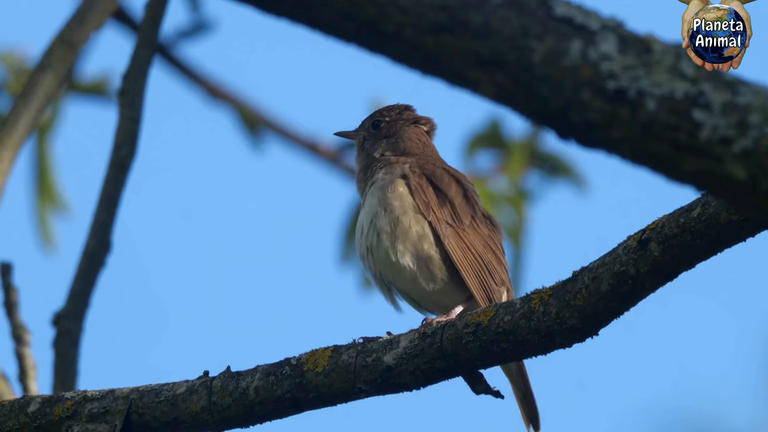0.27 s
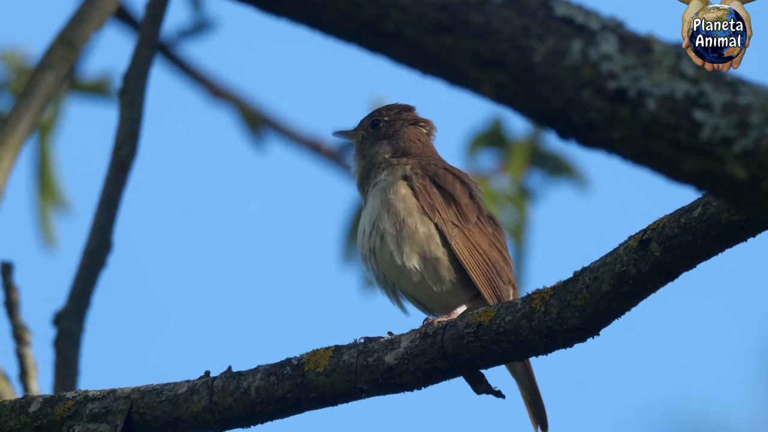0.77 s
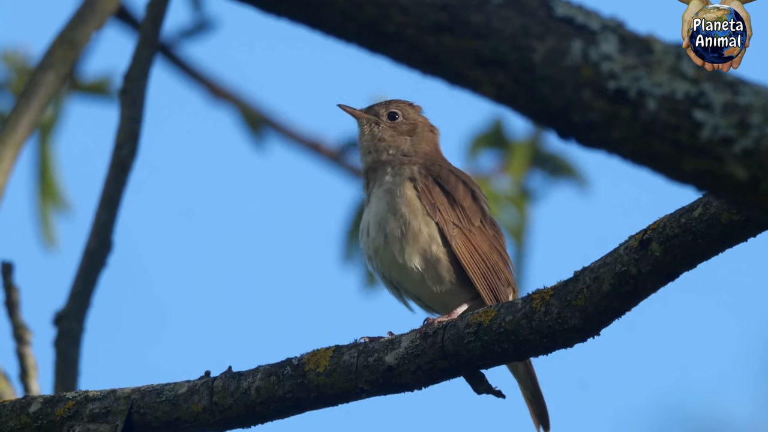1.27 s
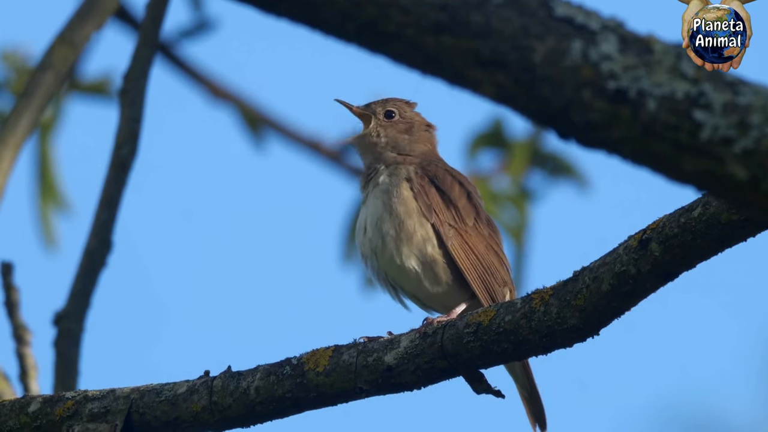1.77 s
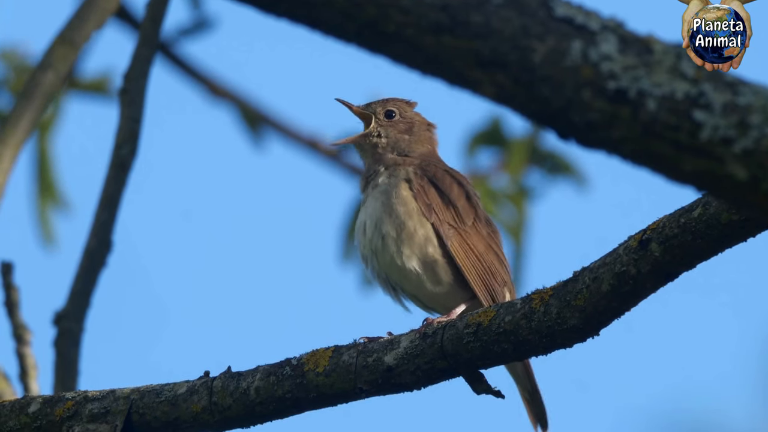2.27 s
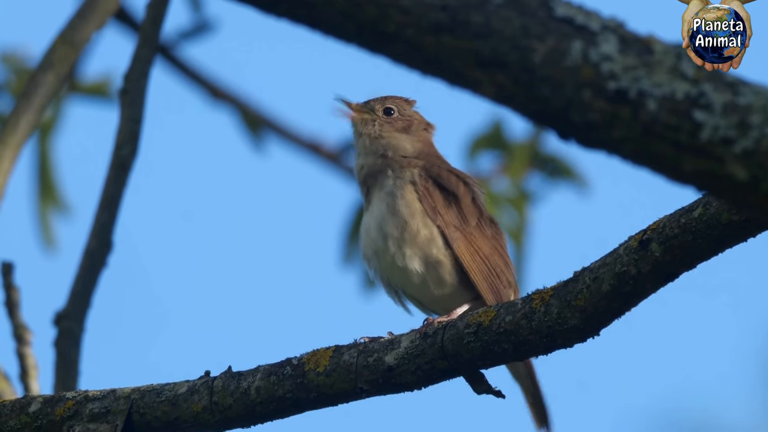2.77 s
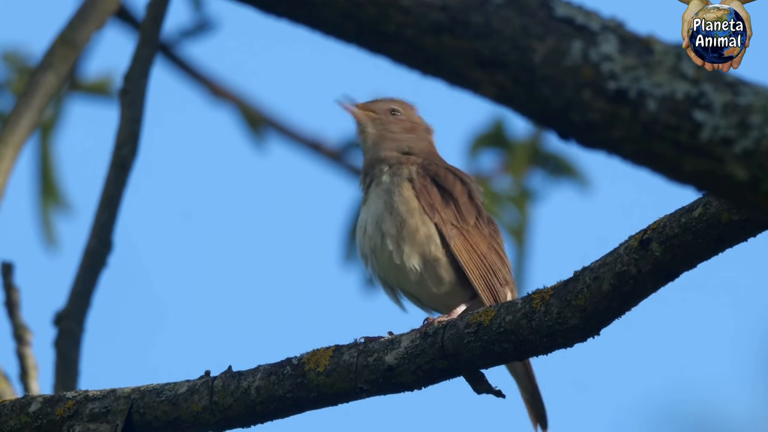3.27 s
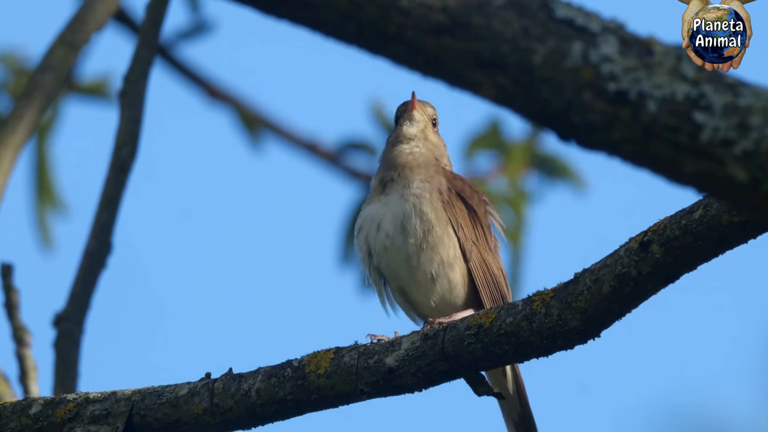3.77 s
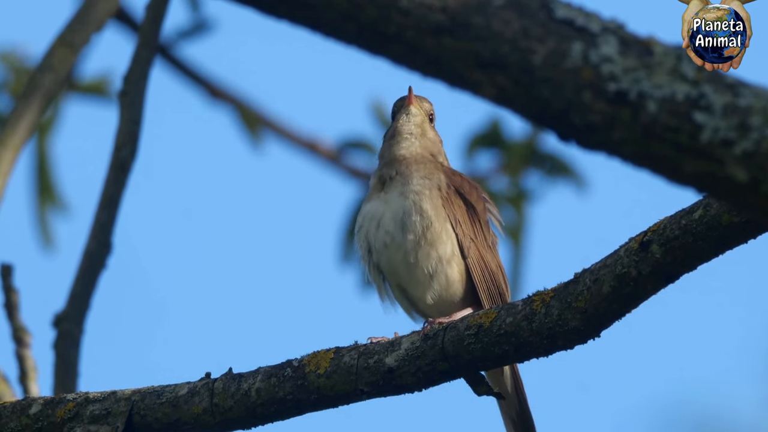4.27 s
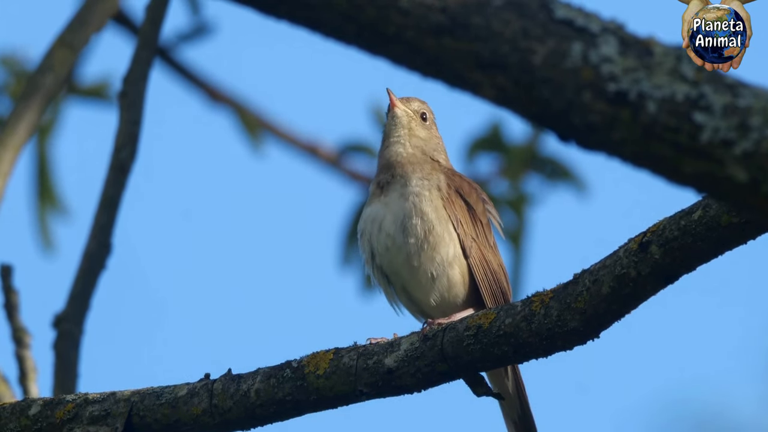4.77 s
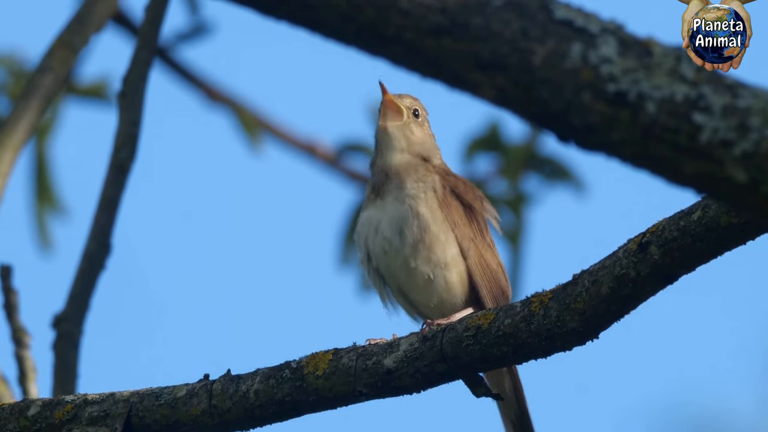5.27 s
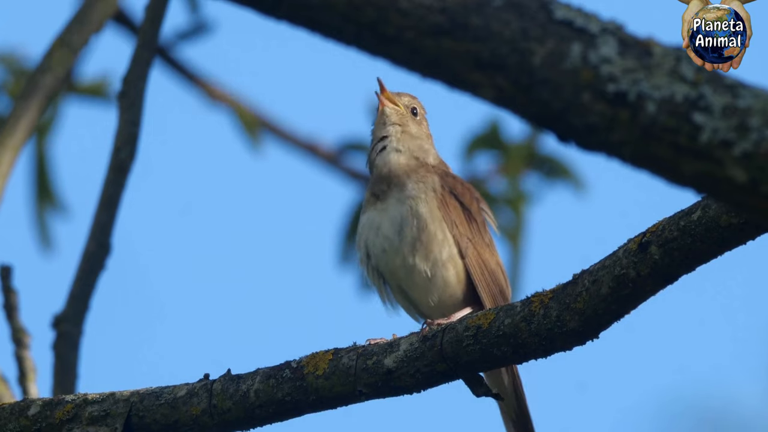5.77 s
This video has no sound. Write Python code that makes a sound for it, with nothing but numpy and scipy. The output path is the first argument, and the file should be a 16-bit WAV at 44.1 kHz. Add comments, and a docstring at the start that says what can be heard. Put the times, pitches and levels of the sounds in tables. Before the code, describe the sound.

After an instant of silence, a close nightingale begins with the end of a faint whistle, a tiny thin seep near 0.3 s and a swelling whistle at 0.5-0.7 that leaps upward. Soft falling flute notes at 0.9 and 1.5 are answered by sharp, warbled high slurs at 1.15 and 1.75, each trailing a fast train of ticks. A swoop at 2.05, another ticking slur at 2.3, then three swoops with downward flicks from 2.55 to 3.25, low murmurs between. A dry, snapping rattle runs 3.35-3.75; its echo cuts off abruptly. A loud whistle swells at 3.9-4.1. Rasps at 4.3 and 4.75 each lead to a chipped, falling drop. From 5.15 to the end, five whip-and-double-note syllables repeat about five per second. Trees return short, bright echoes. Far away, coos sound before 1 s, faint twittering and three hoarse caws around 1.4-2.4, over soft rumble, engine hum and hiss.

```python
"""A nightingale sings close to the microphone: swelling whistles, falling flute notes, sharp slurs with trains of
high ticks, swoops, a rattle, rasps and a closing run of repeated notes. Each note is a gesture of pitch and pressure
driving an oscillating membrane in the syrinx, shaped by the throat. Trees scatter the song as filtered, decaying
noise echoes; a crow (pulses through resonances) and small birds call far off over a faint rumble, hum and hiss."""
import sys
import numpy as np
from scipy import signal
from scipy.fft import rfft, irfft
from scipy.io import wavfile
from scipy.ndimage import uniform_filter1d

SR = 44100
rng = np.random.default_rng(int(sys.argv[2]) if len(sys.argv) > 2 else 0)


def bounce(signal):
    """Save signal as a 16-bit WAV file at the path given by the first command-line argument."""
    frames = np.transpose(np.atleast_2d(signal))
    limited = np.clip(frames, -1, 1)
    pcm = np.round(limited * 32767).astype(np.int16)
    wavfile.write(sys.argv[1], SR, pcm)


N = 265702
TOP_HZ = 15700  # upper limit of the sound
ACCENT_MS = 4.55  # time constant of the push at the start of falls and swoops

# Slurs with their ticks. Each row: start in seconds, pitch factor, gain in dB, ticks' delay in ms,
# tick spacing in ms, tick count, ticks' gain in dB.
SLURS = [(1.1505, 0.95, -2, 39, 11.6, 6, -3.5), (1.746, 1.004, -0.4, 38, 12.1, 7, 0),
         (2.278, 0.99, -0.6, 30, 11.7, 8, -1.5)]
# Loud falling notes. Each row: start in seconds, pitch factor, gain in dB.
DROPS = [(4.5207, 0.96, -1.1), (4.9584, 0.98, 0.11)]
# Overtones passed by the throat. Each row: frequency in Hz, relative level in dB.
THROAT = [(2600, -32), (3600, -32), (4400, -42), (6500, -51.5), (8500, -57.5), (10400, -52), (11900, -52),
          (13500, -61), (15500, -69)]


def undb(db):
    """Decibels to gain."""
    return 10 ** (np.asarray(db) / 20)


def unit(x):
    """Scale to rms 1."""
    return x / np.sqrt(np.mean(x ** 2) + 1e-18)


def wander(size, hz):
    """Smooth random motion of spread about 1, with rates up to about hz."""
    padded = size + SR // 10
    f = np.fft.rfftfreq(padded, 1 / SR)
    spectrum = rfft(rng.standard_normal(padded)) * np.exp(-(f / hz) ** 2)
    return unit(irfft(spectrum))[:size]


def log_curve(f, hz, values):
    """Read a curve over log frequency."""
    return np.interp(np.log(f + 1), np.log(hz), values)


def add(track, s, sound):
    """Mix a sound into the track at time s, trimming what lies outside."""
    i = int(s * SR)
    sound, i = sound[max(-i, 0):], max(i, 0)
    track[i:i + len(sound)] += sound[:max(N - i, 0)]


def syrinx(gesture, pitch, rough, rough_hz, throat, overtone_db, fundamental_db, count=14):
    """One membrane follows a gesture: a tone with overtones, smeared when its vibration turns irregular."""
    ms, hz, db = np.transpose(gesture)
    t_ms = np.arange(int(ms.max() * SR / 1000)) * 1000 / SR
    size = len(t_ms)
    glide = uniform_filter1d(np.interp(t_ms, ms, hz), SR // 600, mode="nearest")
    glide = pitch * glide * (1 + 0.0027 * wander(size, 120))
    phase = 2 * np.pi * np.cumsum(glide) / SR + rough * wander(size, rough_hz)
    valve = np.sin(np.pi / 2 * np.clip(np.minimum(t_ms, t_ms[-1] - t_ms) / .9, 0, 1)) ** 2
    pressure = valve * undb(np.interp(t_ms, ms, db) + .5 * wander(size, 160))
    pressure = pressure * (1 + rough / 2 * wander(size, rough_hz))
    overtones = 0
    for k in range(2, count + 1):
        level = undb(log_curve(k * glide, *np.transpose(throat)))
        overtones = overtones + level * np.sin(k * phase) * (k * glide < TOP_HZ)
    return pressure * (undb(fundamental_db) * np.sin(phase) + undb(overtone_db) * overtones)


def sing(gesture, notes, rough=0., rough_hz=1500., throat=THROAT, overtone_db=0., fundamental_db=0.):
    """Repeat one gesture at the notes' times, pitches and gains."""
    out = np.zeros(N)
    for s, factor, db, *_ in notes:
        note = syrinx(gesture, factor, rough, rough_hz, throat, overtone_db, fundamental_db)
        add(out, s, undb(db) * note)
    return out


def later(notes, delay_ms):
    """The same notes, shifted in time."""
    return [(s + delay_ms / 1000, factor, db) for s, factor, db in notes]


def pulsed(notes, pattern):
    """Break each note into a pattern of pulses."""
    pulses = []
    for ms, ratio, step_db in pattern:
        changed = [(s, factor * ratio, db + step_db) for s, factor, db in notes]
        pulses += later(changed, ms)
    return pulses


def clock(length_ms):
    """Time within a note, in ms."""
    return np.linspace(0, length_ms, 300)


def gesture_of(ms, hz, db, attack_ms, release_ms):
    """Rows of ms, Hz and dB: pressure opens and closes smoothly around the given level."""
    edge = np.clip(np.minimum(ms / attack_ms, (ms[-1] - ms) / release_ms), 0, 1)
    opening_db = 20 * np.log10(np.sin(np.pi / 2 * edge) ** 2 + .01)
    return np.column_stack([ms, hz, db + opening_db])


def resonance(hz, centre_hz, width_hz, boost_db):
    """Swell in dB as the pitch passes the tuning of the throat."""
    return boost_db * np.exp(-((hz - centre_hz) / width_hz) ** 2)


def sweep(length_ms, start_hz, end_hz, db, peak_ms, rise_db, fall_db):
    """An even glide in log pitch, its level in straight dB lines to and from peak_ms."""
    ms = clock(length_ms)
    level = np.interp(ms, [0, min(peak_ms, length_ms), length_ms], [db - rise_db, db, db - fall_db])
    return np.column_stack([ms, start_hz * (end_hz / start_hz) ** (ms / length_ms), level])


def fall(length_ms, start_hz, end_hz, settle_ms, db, accent_db, fade_db, attack_ms, release_ms):
    """The membrane relaxes: pitch settles on a low note while the pressure runs out."""
    ms = clock(length_ms)
    hz = end_hz + (start_hz - end_hz) * np.exp(-ms / settle_ms)
    level = db + accent_db * np.exp(-ms / ACCENT_MS) - fade_db * (ms / length_ms) ** 2
    return gesture_of(ms, hz, level, attack_ms, release_ms)


def hold(length_ms, hz, db, attack_ms, release_ms):
    """A level note on one pitch."""
    ms = clock(length_ms)
    return gesture_of(ms, np.full_like(ms, hz), db, attack_ms, release_ms)


def whistle(length_ms, low_hz, sag_hz, sag_ms, leap_hz, leap_at_ms, leap_ms,
            db, swell_db, attack_ms, release_ms):
    """A long crescendo that sags in pitch, then leaps up near its loudest."""
    ms = clock(length_ms)
    sag = sag_hz * np.maximum(1 - ms / sag_ms, 0) ** 2
    leap = leap_hz * (1 + np.tanh((ms - leap_at_ms) / leap_ms)) / 2
    level = db + swell_db * (ms / length_ms - 1)
    return gesture_of(ms, low_hz + sag + leap, level, attack_ms, release_ms)


def slur(length_ms, start_hz, end_hz, settle_ms, warble_hz, depth_hz, db, attack_ms, release_ms):
    """A steep high fall with a quick warble that grows on the way down."""
    ms = clock(length_ms)
    fallen = 1 - np.exp(-ms / settle_ms)
    warble = depth_hz * np.sqrt(fallen) * np.sin(2 * np.pi * warble_hz * ms / 1000)
    hz = start_hz + (end_hz - start_hz) * fallen + warble
    return gesture_of(ms, hz, db, attack_ms, release_ms)


def swoop(length_ms, low_hz, dip_hz, dip_ms, climb_hz, turn_ms, climb_ms,
          db, accent_db, attack_ms, release_ms):
    """Pitch dips quickly and climbs back through the tuning of the throat."""
    ms = clock(length_ms)
    climb = np.sin(np.pi / 2 * np.clip((ms - turn_ms) / climb_ms, 0, 1)) ** 2
    hz = low_hz + dip_hz * np.exp(-ms / dip_ms) + climb_hz * climb
    level = db + resonance(hz, centre_hz=2004, width_hz=307, boost_db=7)
    level = level + accent_db * np.exp(-ms / ACCENT_MS)
    return gesture_of(ms, hz, level, attack_ms, release_ms)


def whip(length_ms, start_hz, end_hz, bend, db, attack_ms, release_ms):
    """An ever faster fall that cracks as it crosses the tuning of the open throat."""
    ms = clock(length_ms)
    hz = start_hz + (end_hz - start_hz) * (ms / length_ms) ** bend
    level = db + resonance(hz, centre_hz=3300, width_hz=247, boost_db=10.5)
    return gesture_of(ms, hz, level, attack_ms, release_ms)


def whistles():
    """Swelling whistles, a thin rising seep that snaps downwards, and the faint, fading tail of another seep."""
    # Each row: start in seconds, pitch factor, gain in dB.
    long_notes = [(-.127, 0.98, -14.5), (0.479, 1.009, -7), (3.867, 0.9955, -1)]
    seep_notes = [(0.264, 1.002, 0.0047)]
    seep_tail_notes = [(3.7472, 0.96, 0.0072)]
    long = whistle(length_ms=211, low_hz=2190.5, sag_hz=248.3, sag_ms=130, leap_hz=457, leap_at_ms=179,
                   leap_ms=13, db=-8.5, swell_db=17.5, attack_ms=143, release_ms=30.8)
    seep = sweep(length_ms=42, start_hz=7000, end_hz=8040, db=-45, peak_ms=26, rise_db=12.5, fall_db=5.5)
    snap = sweep(length_ms=9, start_hz=6860, end_hz=4350, db=-39.5, peak_ms=8.9, rise_db=5, fall_db=-1)
    seep_tail = sweep(length_ms=65, start_hz=7520, end_hz=7600, db=-50.5, peak_ms=24, rise_db=4.5, fall_db=15)
    thin = sing(seep, seep_notes, rough=.03)
    thin = thin + sing(snap, later(seep_notes, delay_ms=31.0), rough=.03)
    thin = thin + sing(seep_tail, seep_tail_notes, rough=.55, rough_hz=400)
    return sing(long, long_notes, overtone_db=-1.5) + thin


def falling_notes():
    """Soft flute notes, low murmurs between the swoops, and loud drops."""
    # Each row: start in seconds, pitch factor, gain in dB.
    flute_notes = [(.896, 1.005, -0.95), (1.497, .98, 0)]
    murmur_notes = [(2.7217, 1.005, -2), (3.0346, 1.005, -2)]
    flute = fall(length_ms=132.4, start_hz=1573, end_hz=1280, settle_ms=30, db=-19, accent_db=6,
                 fade_db=9.5, attack_ms=10.5, release_ms=5.4)
    murmur = fall(length_ms=70, start_hz=1537, end_hz=970, settle_ms=7, db=-30.5, accent_db=26,
                  fade_db=2.5, attack_ms=3.0, release_ms=4.6)
    drop = fall(length_ms=74, start_hz=1940, end_hz=1246, settle_ms=16, db=-14.5, accent_db=12.5,
                fade_db=18, attack_ms=2.7, release_ms=5.8)
    soft = sing(flute, flute_notes, overtone_db=-5) + sing(murmur, murmur_notes, overtone_db=-1.5)
    return soft + sing(drop, DROPS, rough=.012, overtone_db=-0.5)


def tick_trains():
    """After each slur comes a row of even ticks that arches in pitch, no two quite alike."""
    top_tick, droop = 4.4, .165  # index of the arch's top; share by which the first tick lies lower
    ticks = []
    for s, _, _, delay_ms, spacing_ms, count, db in SLURS:
        variation = rng.uniform(-1, 1, (round(count), 2)) * (.025, 1.5)  # pitch share, dB
        for k, (bend, push_db) in enumerate(variation):
            arch = 1 - droop * (k / top_tick - 1) ** 2
            ticks += later([(s, arch + bend, db + push_db)], delay_ms + k * spacing_ms)
    return ticks


def slurs():
    """Sharp warbled slurs and their high ticks."""
    note = slur(length_ms=36.6, start_hz=5678, end_hz=3420, settle_ms=21, warble_hz=152, depth_hz=390,
                db=-14.0, attack_ms=4.5, release_ms=15.2)
    tick = sweep(length_ms=6.7, start_hz=9500, end_hz=6390, db=-27.0, peak_ms=4.04, rise_db=16.5, fall_db=12)
    notes = sing(note, SLURS, rough=.012, rough_hz=925, overtone_db=21)
    return notes + sing(tick, tick_trains(), rough=.046, overtone_db=21)


def swoops():
    """Each swoop ends in a quick downward flick."""
    # Each row: start in seconds, pitch factor, gain in dB, flick's delay in ms, flick's gain in dB.
    swoop_notes = [(2.055, 0.97, -.4, 53.4, -1), (2.561, 0.99, 0, 56, .5), (2.874, 1.04, 0.4, 56, -0.5),
                   (3.183, 1, -0.5, 58, -0.5)]
    note = swoop(length_ms=56.3, low_hz=1382, dip_hz=739, dip_ms=3.49, climb_hz=1093, turn_ms=10,
                 climb_ms=48, db=-16, accent_db=4.5, attack_ms=3.7, release_ms=10)
    flick = sweep(length_ms=20, start_hz=3110, end_hz=1167, db=-7.5, peak_ms=9.6, rise_db=29, fall_db=20.5)
    flicks = []
    for s, _, _, delay_ms, db in swoop_notes:
        flicks += later([(s, 1, db)], delay_ms)
    notes = sing(note, swoop_notes, rough=0.01, rough_hz=700, overtone_db=-1.5)
    return notes + sing(flick, flicks, rough=0.046, overtone_db=0.5)


def rattle():
    """Each roll is a hoarse chuff and three steep snaps, the first one lower and louder."""
    # Each row: start in seconds, pitch factor, gain in dB.
    rolls = [(3.374, 1.085, -0.055), (3.5085, 1.016, 0.19), (3.648, 0.99, -0.37)]
    # Snaps of a roll. Each row: delay in ms, pitch factor, gain in dB.
    roll_pattern = [(0, 0.9, 2), (36.5, 1.02, -2), (73, 0.99, -3.4)]
    snap = sweep(length_ms=8.6, start_hz=7600, end_hz=3100, db=-18, peak_ms=4.3, rise_db=22, fall_db=20)
    chuff = sweep(length_ms=12, start_hz=3490, end_hz=3660, db=-27, peak_ms=12, rise_db=16.0, fall_db=12.5)
    snaps = sing(snap, pulsed(rolls, roll_pattern), rough=0.22, rough_hz=2060, overtone_db=24)
    chuffs = sing(chuff, later(rolls, delay_ms=-20.5), rough=0.88, rough_hz=1170, overtone_db=14.5)
    return snaps + chuffs


def harsh_notes():
    """Both sides of the syrinx rasp irregularly and modulate each other; a two-voiced chip leads each drop."""
    # Each row: start in seconds, pitch factor, gain in dB.
    rasp_notes = [(4.289, 0.99, -1.8), (4.7425, 0.98, 1.9)]
    # Pulses of a rasp. Each row: delay in ms, pitch factor, gain in dB.
    rasp_pattern = [(0, 1, -3.5), (9.2, 0.99, -0.5), (17.6, 0.99, -3)]
    rasps, chips = pulsed(rasp_notes, rasp_pattern), later(DROPS, delay_ms=-19.0)
    low_rasp = sweep(length_ms=8, start_hz=4264, end_hz=3245, db=-21.5, peak_ms=1.2, rise_db=0.5, fall_db=11)
    high_rasp = sweep(length_ms=8, start_hz=7090, end_hz=5410, db=-21, peak_ms=3.0, rise_db=7.5, fall_db=7.5)
    low = sing(low_rasp, rasps, rough=0.74, rough_hz=1480, overtone_db=32.0)
    high = sing(high_rasp, rasps, rough=.65, rough_hz=1300, overtone_db=28)
    low_chip = sweep(length_ms=11, start_hz=2093, end_hz=1780, db=-18.5, peak_ms=1.3, rise_db=3.0, fall_db=15)
    high_chip = sweep(length_ms=15, start_hz=2710, end_hz=2450, db=-25.5, peak_ms=2.1, rise_db=5.5, fall_db=10)
    chip = sing(low_chip, chips, rough=0.36, rough_hz=500, overtone_db=14.5)
    chip = chip + sing(high_chip, chips, rough=1.0, rough_hz=700, overtone_db=18.5)
    return low + high + 4.0 * low * high + chip


def closing_run():
    """The high side whips down while the low side creaks, then the low side sings a double note stepping up."""
    # Each row: start in seconds, whip's pitch factor, gain in dB, double note's delay in ms,
    # double note's pitch factor.
    syllables = [(5.157, .975, -3.5, 29, .99), (5.360, 0.99, -1, 31.5, .988), (5.5759, 1, .5, 31, 1.023),
                 (5.787, 1.008, -0.5, 32, 1.018), (5.9963, 0.99, -1.5, 27, 1.05)]
    # Creak's overtones, beak wide open. Each row: frequency in Hz, relative level in dB.
    open_throat = [(2100, -4.5), (3200, 4), (4250, 1), (5300, -5), (6400, -24.5), (7400, -21.5),
                   (8500, -22), (9600, -24.5), (11200, -24), (15000, -43.5)]
    crack = whip(length_ms=25, start_hz=4250, end_hz=2246, bend=1.5, db=-15.5, attack_ms=2.0, release_ms=6.2)
    creak = sweep(length_ms=13, start_hz=1038, end_hz=1137, db=-20, peak_ms=5.84, rise_db=12, fall_db=9.5)
    first = hold(length_ms=27, hz=2016.7, db=-7.5, attack_ms=4.5, release_ms=3.65)
    second = hold(length_ms=36.5, hz=2051.5, db=-6.5, attack_ms=14.4, release_ms=12)
    doubles = []
    for s, _, db, delay_ms, factor in syllables:
        doubles += later([(s, factor, db)], delay_ms)
    whips = sing(crack, syllables, rough=.019, rough_hz=2970, overtone_db=13.5)
    creaks = sing(creak, syllables, rough=0.14, rough_hz=700, throat=open_throat, fundamental_db=-46)
    firsts = sing(first, doubles, overtone_db=-1.0)
    seconds = sing(second, later(doubles, delay_ms=32), overtone_db=-6)
    return whips + creaks + firsts + seconds


def trees(x, gap_s, near_db, near_s, far_db):
    """Nearby branches return a quick cluster of echoes; the wood beyond adds a tail decaying band by band."""
    # Each row: band centre in Hz, relative level in dB, decay time t60 in seconds.
    bands = [(500, -23, 1.3), (950, -19, 1.0), (1370, -17, 0.73), (1850, -16.5, 0.71), (2360, -10.5, 0.69),
             (2940, -10, 0.72), (3340, -8.5, 0.43), (4000, -16.5, 0.64), (5030, -10.5, 0.55),
             (7500, -8, .42), (11500, -1, 0.27), (15000, -10, .28)]
    t = np.arange(SR) / SR
    f = np.fft.rfftfreq(SR, 1 / SR)
    hz, db, t60 = np.transpose(bands)
    scatter = rfft(rng.standard_normal(SR) * rng.exponential(1, SR) / np.sqrt(2))
    onset = np.clip((t - gap_s) / 0.0037, 0, 1)
    cluster_and_tail = undb(far_db) + undb(near_db) * np.exp(-t / near_s)
    response = 0
    for share, d, decay_s in zip(np.eye(len(hz)), db, t60):
        band = irfft(scatter * log_curve(f, hz, share), SR)
        fade = onset * np.exp(-np.log(1000) * t / decay_s) * cluster_and_tail
        response = response + undb(d) * band * fade / np.sqrt(SR / 20)
    return signal.fftconvolve(x, response)[:N]


def crow():
    """Hoarse, uneven pulses through a fixed throat."""
    # Each row: start in seconds, length in seconds, nominal pitch in Hz, relative level in dB.
    caws = [(1.393, 0.12, 483, -48.5), (1.821, 0.13, 493.8, -47), (2.247, 0.13, 507.6, -46.5)]
    # Resonances. Each row: centre in Hz, width in Hz, relative level in dB.
    crow_throat = [(504, 180, -6.5), (1120, 260, 2.5), (1270, 94, 8.5), (2000, 320, -23.5)]
    out = np.zeros(N)
    for s, length_s, hz, db in caws:
        size = int(length_s * SR)
        arch = np.sin(np.pi * np.arange(size) / size)
        cycles = np.cumsum(hz * (.95 + .06 * arch + .06 * wander(size, 200))) / SR
        pulses = np.diff(np.floor(cycles), prepend=0)
        voice = 0
        for f, width_hz, d in crow_throat:
            voice = voice + undb(d) * signal.lfilter(*signal.iirpeak(f, f / width_hz, fs=SR), pulses)
        voice = signal.sosfilt(signal.butter(4, 2100, fs=SR, output="sos"), voice)  # distance dulls it
        add(out, s, undb(db) * unit(voice * np.sqrt(arch)))
    return out


def far_birds(count=6):
    """Small birds far away: two coos, and fainter, higher twittering at random times and pitches."""
    # Each row: start in seconds, pitch factor, gain in dB.
    coo_notes = [(.31, 1.04, -5.5), (.765, 1, 0)]
    # Earliest and latest twitter start, in seconds.
    twitter_s = (1, 1.8)
    coo = sweep(length_ms=145, start_hz=1900, end_hz=1730, db=-54.5, peak_ms=45, rise_db=9, fall_db=8)
    twitter = sweep(length_ms=320, start_hz=3260, end_hz=2990, db=-66.0, peak_ms=70, rise_db=11, fall_db=8)
    draws = rng.uniform((twitter_s[0], 1), (twitter_s[1], 1.45), (count, 2))
    calls = [(s, factor, 0) for s, factor in draws]
    return sing(coo, coo_notes, rough=1.0, rough_hz=130) + sing(twitter, calls, rough=1.0, rough_hz=130)


def coloured(spectrum):
    """Noise of rms 1 with a given spectrum."""
    f = np.fft.rfftfreq(N, 1 / SR)
    shape = undb(log_curve(f, *np.transpose(spectrum)))
    return unit(irfft(rfft(rng.standard_normal(N)) * shape, N))


def background():
    """Low outdoor rumble of wandering level, a distant engine's wavering hum and a thin steady hiss."""
    # Each row: frequency in Hz, relative density in dB per Hz.
    rumble_spectrum = [(15, -35), (25, -3), (43, -1.5), (83, -4.5), (103, -8), (123, -7.5), (367, -17.5),
                       (438, -18.5), (624, -20.5), (850, -23.5), (1100, -50.5), (1870, -120)]
    hiss_spectrum = [(400, -9.5), (900, 0.5), (1600, -3), (3200, -6), (7000, -15), (13000, -12),
                     (15500, -11)]
    # Each row: frequency in Hz, rms level in dB.
    hum_tones = [(40.5, -55), (80.5, -60.5)]
    rumble_db, hiss_db = -49.5, -59
    rumble = coloured(rumble_spectrum) * undb(rumble_db + 0.89 * wander(N, 3))
    t = np.arange(N) / SR
    hum = 0
    for hz, db in hum_tones:
        phase = 2 * np.pi * hz * t + 1.2 * wander(N, 2.9)
        hum = hum + undb(db) * np.sqrt(2) * np.sin(phase)
    return rumble + hum + undb(hiss_db) * coloured(hiss_spectrum)


def scene():
    """The near bird with its echoes, far birds heard mostly through the trees, and the background."""
    # The bird turns its head; sideways, more song goes by way of the trees.
    # Each row: time in seconds, send to the trees in dB.
    head_turn = [(0, 6.5), (.8, 3), (1.2, 1.5), (2, 1.5), (3.2, 2.5), (3.5, 1.5), (4.1, -0.5), (5, 0.5),
                 (6, -1)]
    break_s = 3.747
    t = np.arange(N) / SR
    bird = whistles() + falling_notes() + slurs() + swoops() + rattle() + harsh_notes() + closing_run()
    # a small beak radiates little bass
    bird = signal.sosfilt(signal.butter(6, 860, "high", fs=SR, output="sos"), bird)
    outward = bird * undb(np.interp(t, *np.transpose(head_turn)))
    # the echoes of the first phrase break off abruptly at break_s
    echoes = 0
    for on in (t < break_s, t >= break_s):
        echoes = echoes + on * trees(on * outward, gap_s=0.0029, near_db=5, near_s=0.047, far_db=-3.0)
    calls = crow() + far_birds()
    far = undb(-1.5) * calls + trees(calls, gap_s=0.017, near_db=-3.5, near_s=.05, far_db=18.0)
    return (bird + echoes + far + background())[None]


def record(dry):
    """Silent at first, then the sound opens within 2 ms; the top is cut steeply."""
    open_s = .045
    opened = np.clip((np.arange(N) / SR - open_s) / .002, 0, 1)
    return signal.sosfilt(signal.ellip(10, .1, 90, TOP_HZ, fs=SR, output="sos"), dry * opened)


dry = scene()
out = record(dry)
bounce(out)
```